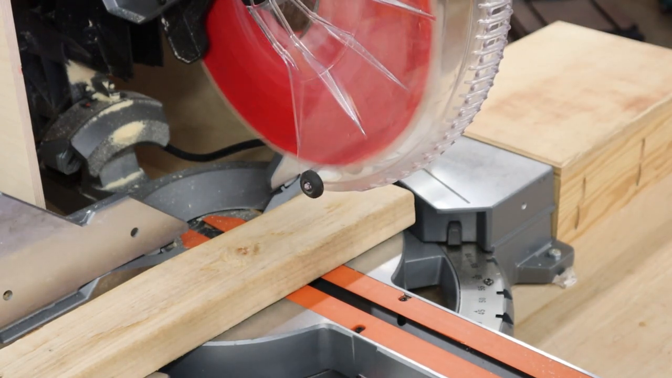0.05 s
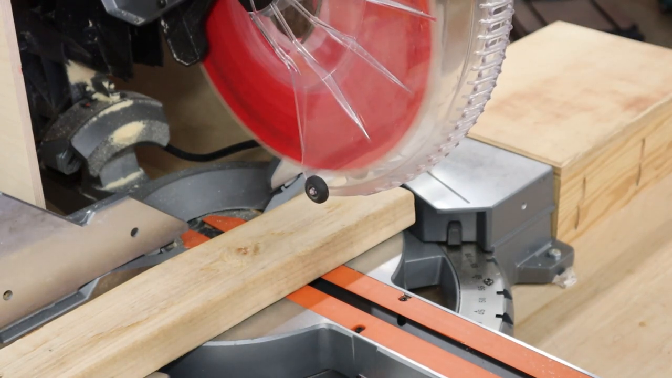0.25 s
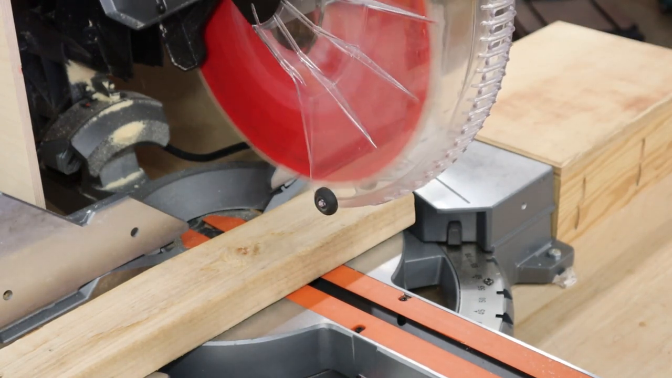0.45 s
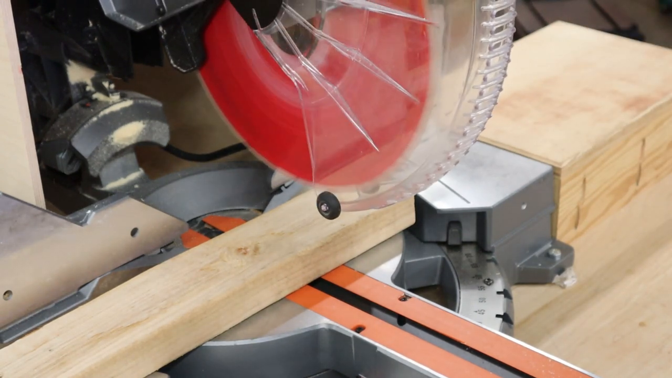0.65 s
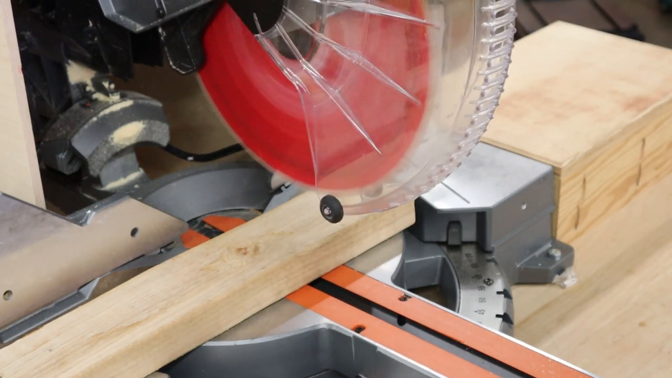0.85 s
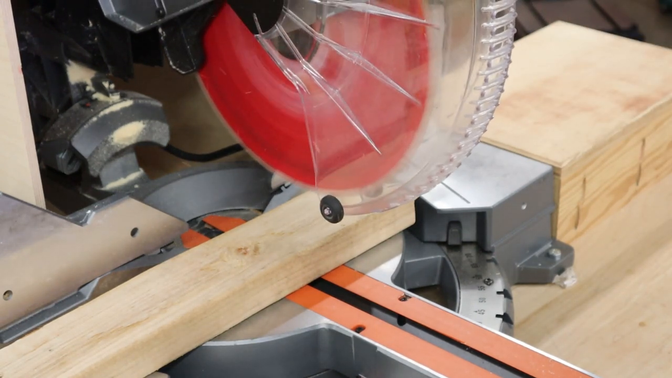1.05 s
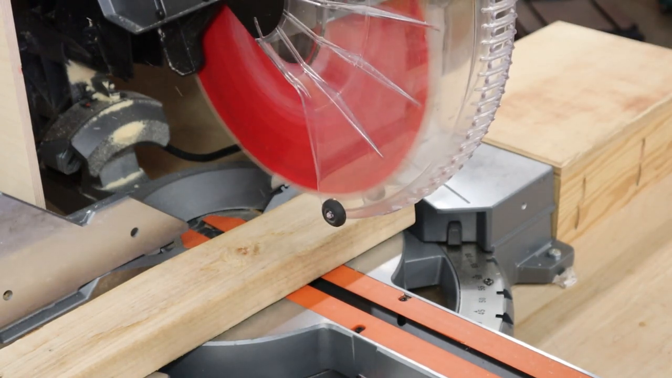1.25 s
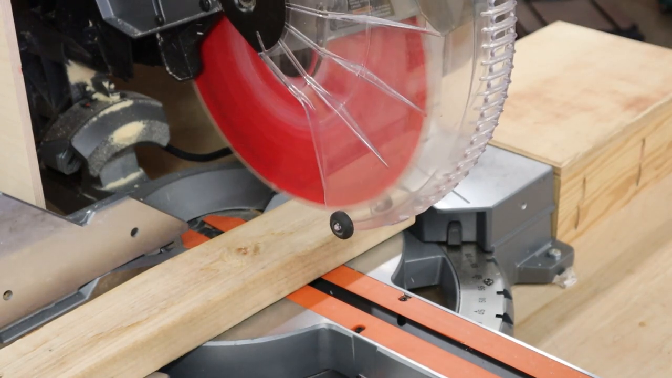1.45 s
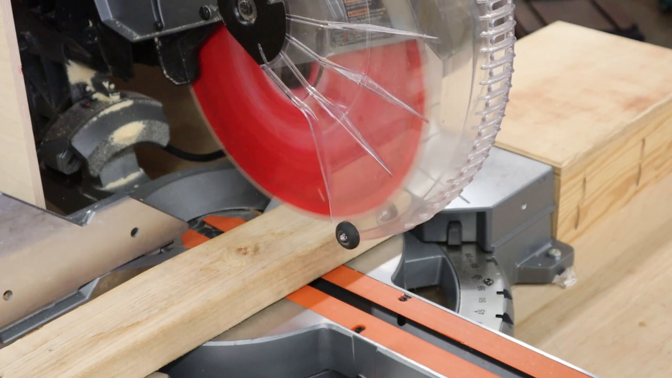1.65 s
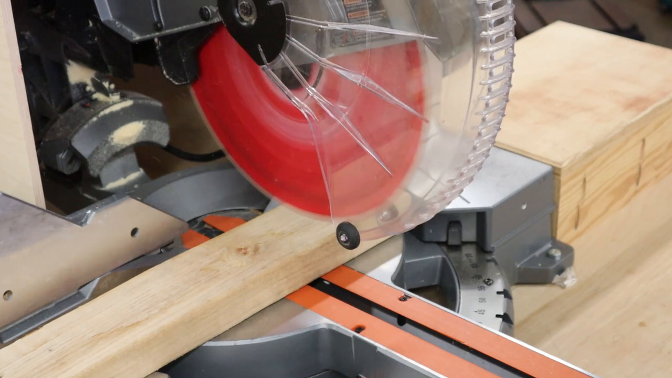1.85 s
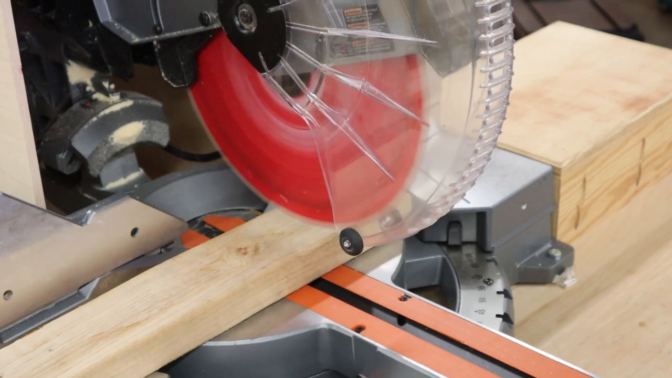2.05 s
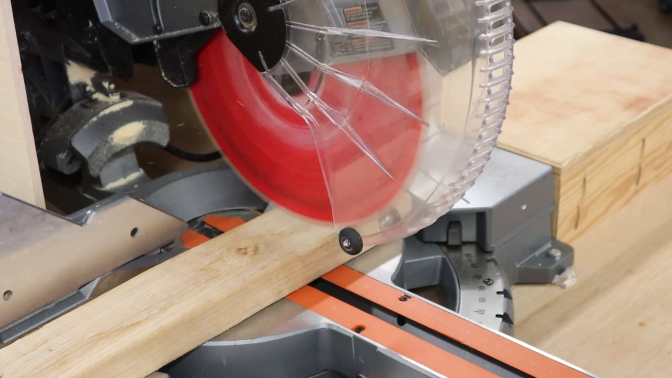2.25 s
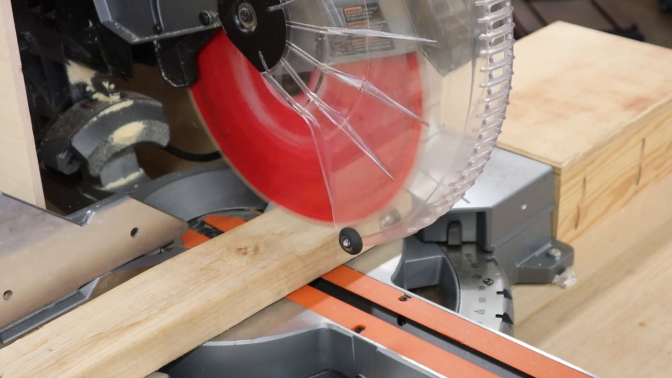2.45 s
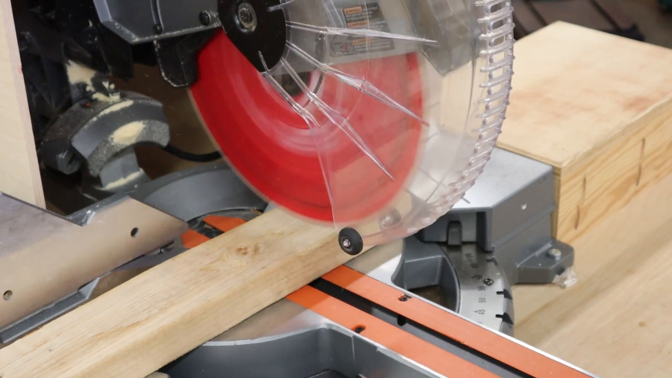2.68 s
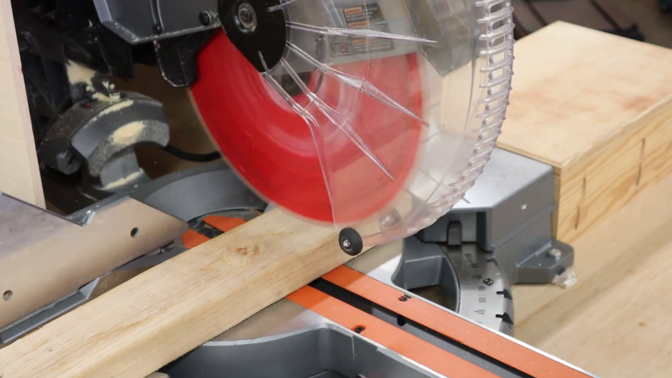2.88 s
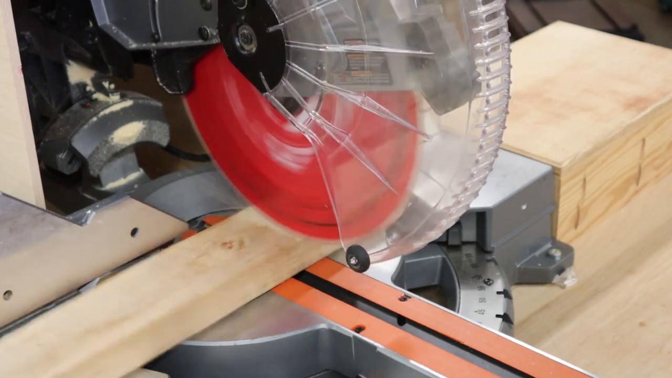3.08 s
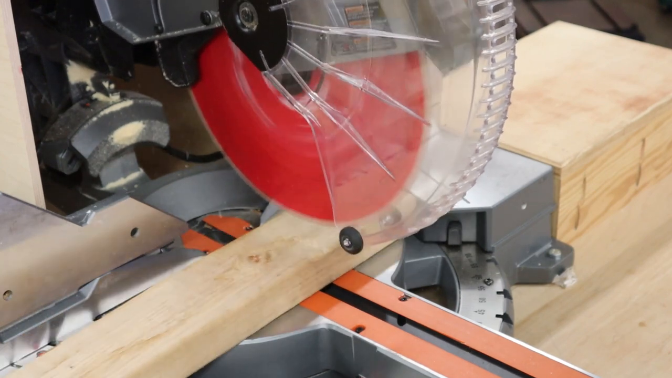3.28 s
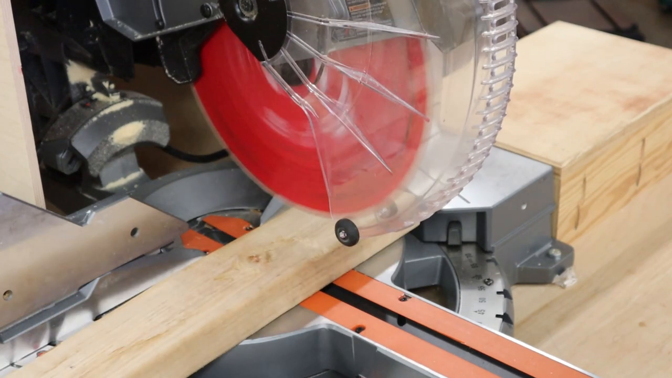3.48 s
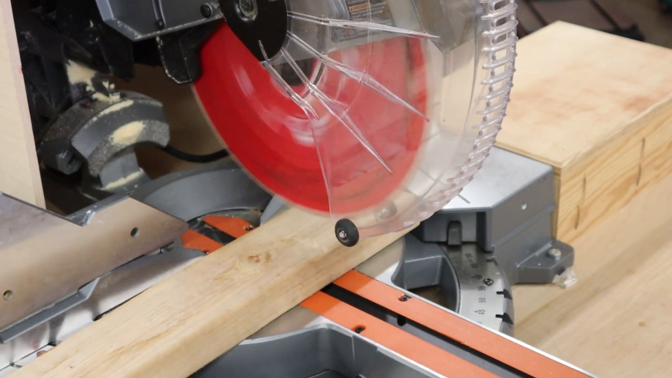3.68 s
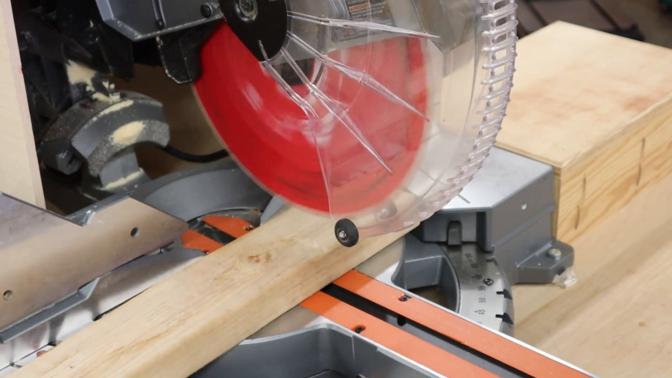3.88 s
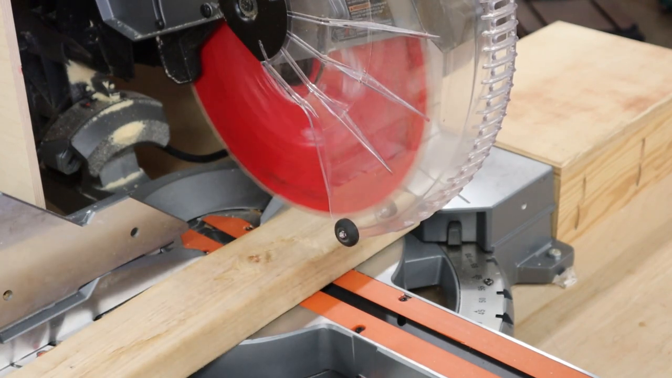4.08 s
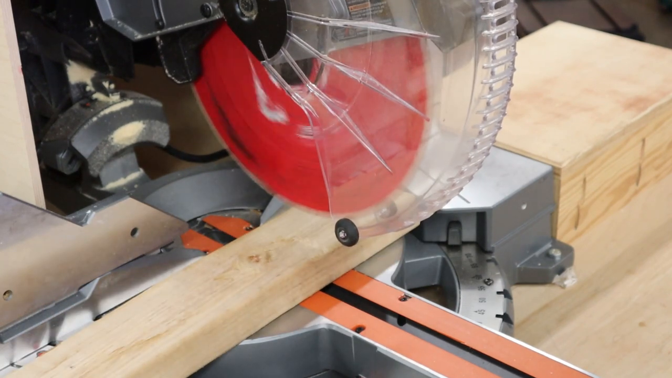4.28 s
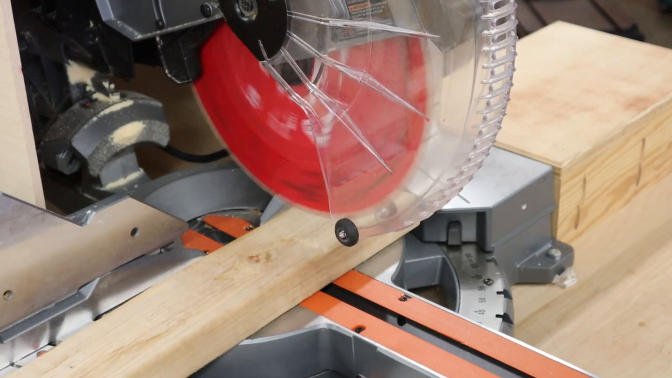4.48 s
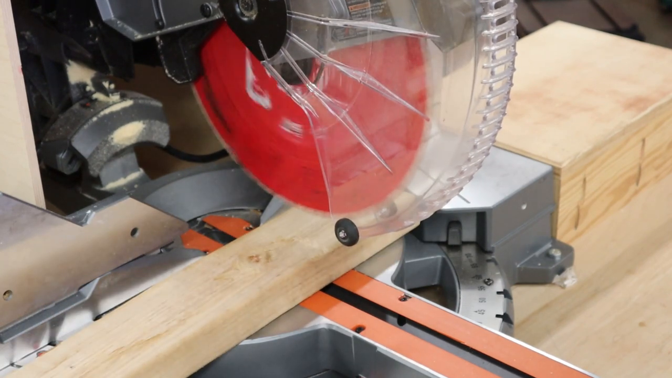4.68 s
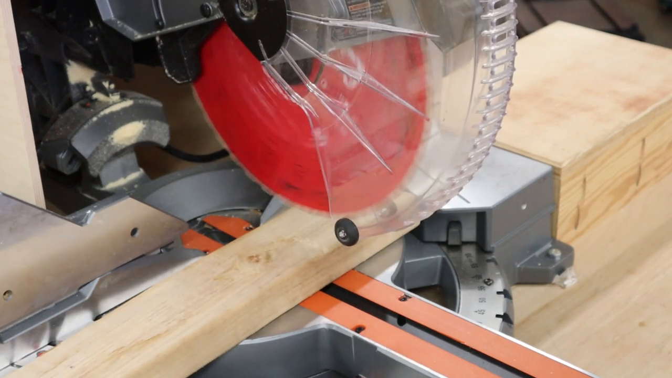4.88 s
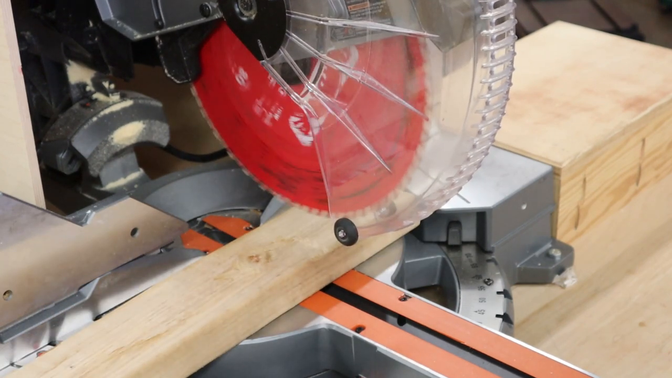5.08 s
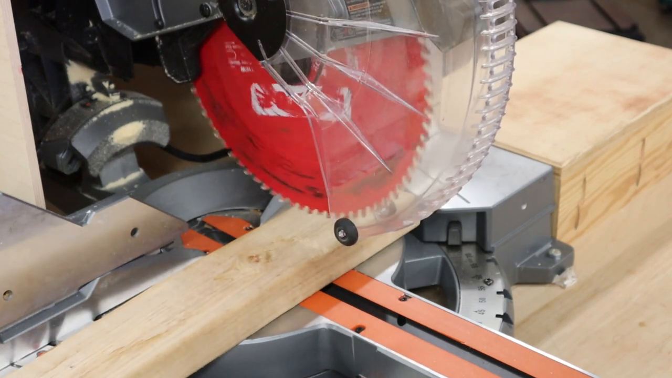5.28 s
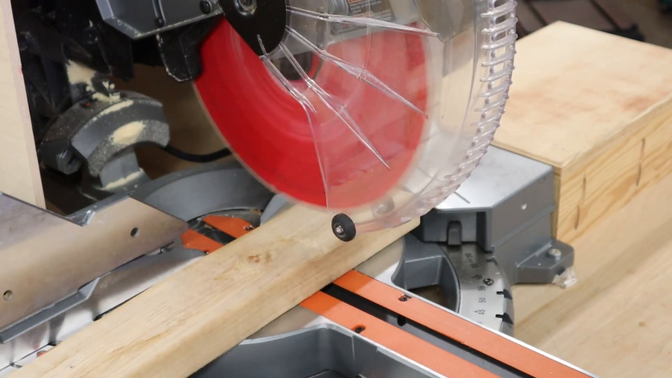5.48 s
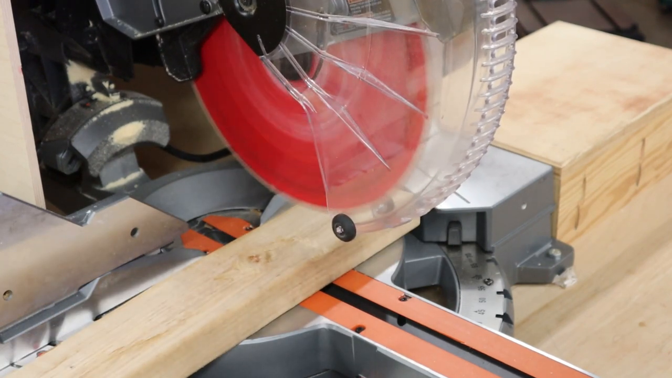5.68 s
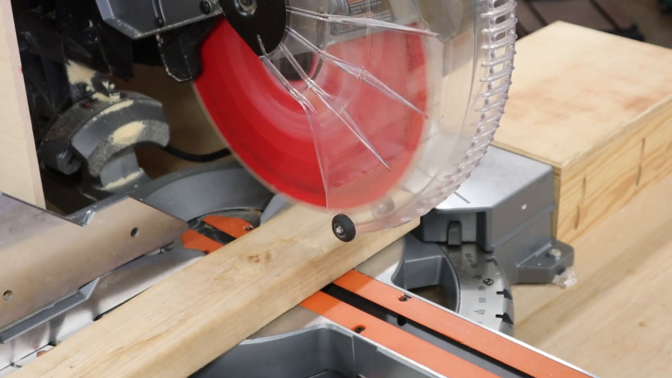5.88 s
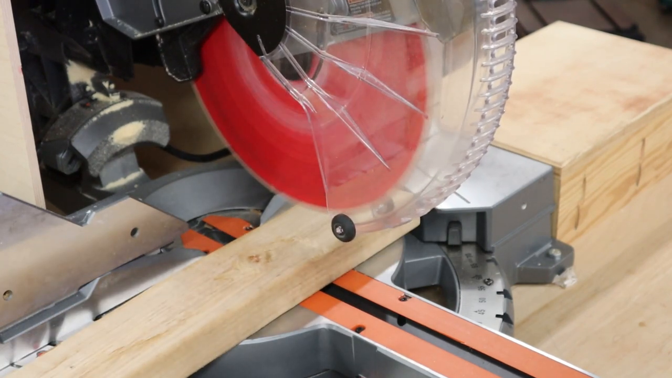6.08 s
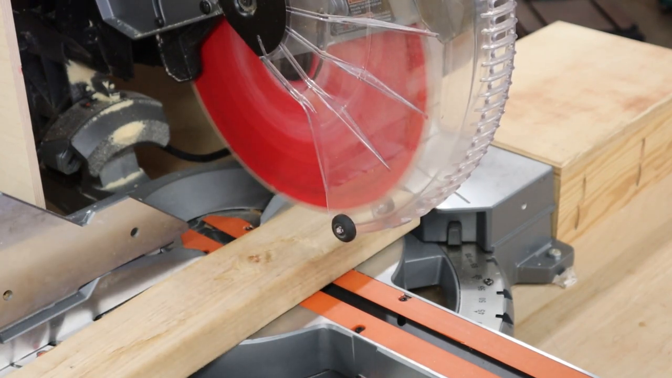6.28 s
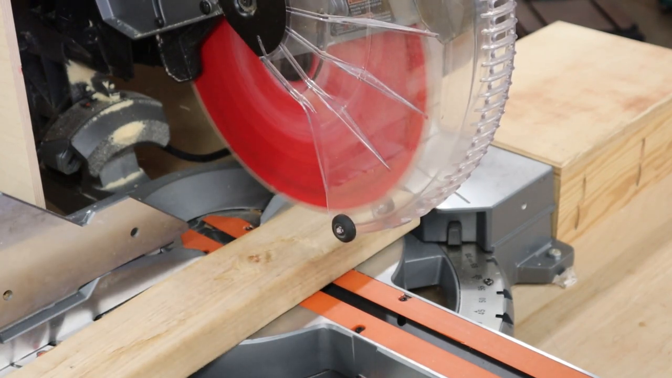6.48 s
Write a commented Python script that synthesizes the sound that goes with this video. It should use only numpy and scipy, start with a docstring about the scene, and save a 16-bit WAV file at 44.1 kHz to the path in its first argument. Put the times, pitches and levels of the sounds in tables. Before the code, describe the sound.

A miter saw clunks on, whines up to a loud full-speed scream, brakes with a knock, coasts down chattering, then whines up again.

```python
"""Miter saw, switched on twice

Switch click, jolt and clang; mains hum; gear whine and rattle run up to speed in a rush of fan and blade air.
The trigger is let go: the motor brakes with a knock, the slowing blade rasps and knocks on a board, then coasts
with chattering gears. Just before standstill it is switched on again. One shaft speed drives tones locked to the
shaft, random tooth impacts through housing resonances, and filtered noise. Small workshop, peaks overloaded."""
import sys
import numpy as np
from scipy import signal
from scipy.fft import rfft, irfft
from scipy.io import wavfile
from scipy.ndimage import uniform_filter1d

SR = 44100
rng = np.random.default_rng(int(sys.argv[2]) if len(sys.argv) > 2 else 0)


def store_pcm(level_fs):
    """Save levels as 16-bit WAV."""
    pcm = np.round(np.clip(level_fs, -1, 1) * 32767).astype(np.int16)
    wavfile.write(sys.argv[1], SR, np.atleast_2d(pcm).T)


N = 288414
TIME = np.arange(N) / SR
STARTS_S, BRAKE_S, COAST_S = [0.0, 5.444], 2.012, 3.245
GEAR_RATIO = 5  # shaft turns per blade turn


def from_db(db):
    """Decibels to gain."""
    return 10 ** (np.asarray(db) / 20)


def rms_one(x):
    """Scale to rms 1."""
    return x / np.sqrt(np.mean(x ** 2) + 1e-20)


def in_time(rows):
    """Each column of a curve, interpolated at every sample."""
    time_s, *columns = np.transpose(rows)
    return [np.interp(TIME, time_s, column) for column in columns]


def drift(corner_hz):
    """Smooth random wavering of spread 1: noise through a double pole, at SR / 20."""
    pole = np.exp(-40 * np.pi * corner_hz / SR)
    noise = rng.standard_normal(N // 20 + 2002)
    slow = signal.lfilter([1], [1, -2 * pole, pole * pole], noise)[2000:]
    return np.interp(np.arange(N) / 20, np.arange(len(slow)), rms_one(slow))


def colour(x, spectrum, resonances=(), size=8192):
    """Causal filter: a smooth spectrum with resonance peaks on top."""
    hz = np.fft.rfftfreq(size, 1 / SR) + 1
    points_hz, levels_db = np.transpose(spectrum)
    db = np.interp(np.log(hz), np.log(points_hz), levels_db)
    for centre_hz, width_hz, boost_db in resonances:
        db = db + boost_db / (1 + (2 * (hz - centre_hz) / width_hz) ** 2)
    cepstrum = irfft(np.log(from_db(db)))[:size // 2]
    cepstrum[1:] *= 2  # minimum phase: nothing rings before its cause
    response = irfft(np.exp(rfft(cepstrum, size)))
    return signal.fftconvolve(x, response)[:N]


def dull_and_bright(x, split_hz=1900):
    """The parts below and above a split, each of rms 1."""
    filters = [signal.butter(4, split_hz, kind, fs=SR, output="sos") for kind in ("low", "high")]
    return [rms_one(signal.sosfilt(sos, x)) for sos in filters]


def impacts(per_s, spread_db):
    """Tiny random collisions of uneven strength; rms 1."""
    strength = from_db(spread_db * np.minimum(rng.exponential(1, N), 4))
    signed = strength * rng.choice([-1, 1], N)
    return rms_one(signed * (rng.random(N) < per_s / SR))


def strikes(starts_s, levels_db, t60s_s):
    """An envelope that jumps at each start and dies away."""
    envelope = 0
    for start_s, level_db, t60_s in zip(starts_s, levels_db, t60s_s):
        age_s = np.clip(TIME - start_s, 0, 4 * t60_s)
        envelope = envelope + from_db(level_db - 60 * age_s / t60_s) * (TIME >= start_s)
    return envelope


def tone(turns, order, rough_rad, flutter_db, flutter_hz=25):
    """A sine locked to the shaft, with uneven timing and strength; rms 1."""
    phase = 2 * np.pi * order * turns + rough_rad * drift(31.6)
    return rms_one(np.sin(phase) * from_db(flutter_db * drift(flutter_hz)))


# quick and slow approach to full speed: gain_turns_per_s, time_constant_s
RUN_UP = [(135.9, .2308), (220, .8534)]
# braking tends to an end speed; then friction alone slows the shaft
BRAKE_END_TURNS_PER_S, BRAKE_TIME_S, FRICTION_TURNS_PER_S2 = 22.8, .5653, 25.5


def shaft_speed():
    """Turns per second: the run-up levels off, braking dies away, coasting runs down evenly."""
    first_run = TIME < STARTS_S[1]
    since_on_s = np.where(first_run, np.minimum(TIME, BRAKE_S) - STARTS_S[0], TIME - STARTS_S[1])
    driven = sum(gain * (1 - np.exp(-since_on_s / lag_s)) for gain, lag_s in RUN_UP)
    braking_s = np.clip(TIME, BRAKE_S, COAST_S) - BRAKE_S
    excess = driven - BRAKE_END_TURNS_PER_S
    braked = BRAKE_END_TURNS_PER_S + excess * np.exp(-braking_s / BRAKE_TIME_S)
    slowed = braked - FRICTION_TURNS_PER_S2 * np.maximum(TIME - COAST_S, 0)
    return np.maximum(np.where(first_run, slowed, driven), 1)


def motor_state(speed, top_from=265, top_span=45, size=600):
    """Shares 0-1 of speeding up, running at top speed and braking; all zero while coasting."""
    powered = uniform_filter1d(1.0 * ((TIME < BRAKE_S) | (TIME > STARTS_S[1])), size=size)
    braking = uniform_filter1d(1.0 * ((TIME >= BRAKE_S) & (TIME < COAST_S)), size=size)
    at_top = np.clip((speed - top_from) / top_span, 0, 1)
    return np.array([powered * (1 - at_top), powered * at_top, braking])


def above(speed, knee):
    """Rises from 0 to 1 as the speed passes the knee (turns per s)."""
    return 1 / (1 + (knee / speed) ** 4)


def near_speed(speed, state, centre, width, db):
    """A gain that sets in while the motor pulls the gears through a narrow range of speed."""
    return from_db(db * state[0] * np.exp(-np.abs((speed - centre) / width) ** 3))


# blows at every start: delay_s, thud_db, crack_db, ring_db, t60_s
START_KNOCKS = [(0, -20, -8, -22, 0.023), (.0073, 4, -6.5, -8, 0.03), (.075, -20.5, -68, -5, 0.024),
                (.132, -36, -35, -5, .032)]
# brake bites, then blade knocks on the board: start_s, thud_db, crack_db, ring_db, t60_s
KNOCKS = [(2.04, -7, -12, -13, 0.082), (3.237, -30, -27, 1.5, 0.019), (3.245, -13, -18, -19, 0.025)]
# blade modes: pitch_hz, level_db (relative to ring_db), t60_s
BLADE_MODES = [(272.5, -29, 0.83), (1050, -37, 0.12), (1541, 0.5, .04), (1500, -34, 0.56), (3790, -31, .05),
               (5800, -49, .15), (9609, -45, 0.11)]
# thud and crack spectra: freq_hz, density_db_per_hz (relative)
THUD = [(40, -39), (200, -29), (330, -25), (470, 8.5), (700, -2), (1020, 12.5), (1500, -8), (2500, -11),
        (6000, -28), (16000, -48)]
CRACK = [(200, -2.5), (1200, -8.5), (2800, 2.5), (3900, 4.5), (5200, -8), (9000, -6.5), (12000, -13),
         (16000, -35)]
# gear housing and guard resonances: centre_hz, width_hz, boost_db
HOUSING = [(452, 107, 7.5), (600, 38, 0.5), (992, 60, 5.5), (1178, 100, 3), (1454, 49, 4), (1760, 79, 2.5),
           (2433, 84, 4), (2717, 44, 5), (3010, 110, -1), (4240, 770, 5), (5510, 130, 4), (6026, 450, 7.5),
           (6760, 330, 3.5), (7220, 160, 6), (8630, 580, 7), (9550, 340, 5.5), (10000, 200, 2),
           (11300, 180, 5)]


def knocks():
    """Each knock is a thud of the frame, a metallic crack and a ring of the blade."""
    rows = [(on_s + delay_s, *blow) for on_s in STARTS_S for delay_s, *blow in START_KNOCKS]
    start_s, thud_db, crack_db, ring_db, t60_s = np.transpose(rows + list(KNOCKS))
    thud_noise = rms_one(colour(impacts(4400, spread_db=-2.5), THUD, HOUSING))
    thud = strikes(start_s, thud_db, t60_s) * thud_noise
    crack_noise = rms_one(colour(rng.standard_normal(N), CRACK, HOUSING))
    crack = strikes(start_s, crack_db, t60_s) * crack_noise
    blows = np.zeros(N)
    blows[(np.abs(start_s) * SR).astype(int)] = from_db(ring_db)
    age_s = TIME[:SR]
    ring = 0
    for hz, level_db, mode_t60_s in BLADE_MODES:
        ring = ring + from_db(level_db - 60 * age_s / mode_t60_s) * np.sin(2 * np.pi * hz * age_s)
    return thud + crack + signal.fftconvolve(blows, ring)[:N]


# mains hum: pitch_hz, level_db (relative)
HUM = [(120, -22), (240, -52), (360, -62), (480, -15), (600, -28.5)]


def mains_hum(speed, current):
    """Starting current shakes the field coils, hardest once the rotor turns, and fades with gained speed."""
    shaking = current * (.5 + 0.68 * above(speed, knee=43))
    hum = 0
    for hz, level_db in HUM:
        hum = hum + from_db(level_db - 4.5) * np.sin(2 * np.pi * hz * TIME + 0.1 * drift(25))
    return shaking * hum


BEARING_ORDER, MESH_ORDER = 4.08, 8  # cycles per shaft turn
# main tones, before the gear case: rising_db, top_db, braking_db
BEARING_DB, MESH_DB, OCTAVE_DB = (-26, -23.5, -23), (-18.5, -20.5, -22.5), (-22, -33.5, -24)
# on the way up the gears howl: centre_turns_per_s, half_width_turns_per_s, boost_db
HOWL = (149.5, 13.4, 10.8)
# weaker tones: cycles_per_shaft_turn, rising_db, top_db, braking_db (relative)
OVERTONES = [(1.001, -19.5, -18.5, -19), (1.998, -47, -8.5, -44), (5.223, -11, -29, -12),
             (11.92, -37, -12.5, -38), (14.28, -55, -12, -43), (23.92, -13, -19, -26), (32, -12, -19, -26),
             (40.8, -20, -21, -16)]
# gear case radiation: freq_hz, level_db
CASE = [(300, 3), (550, -3), (800, -1.5), (1700, 0), (2400, -3), (3600, -1.5), (4500, -2.5), (5200, 1.5)]
# gear case resonances: centre_hz, width_hz, boost_db
CASE_MODES = [(994, 134, 14.5), (1164, 440, -3.5), (1421, 180, 10.5), (2220, 120, 5), (4250, 460, 11)]
# loaded gear spectrum: freq_hz, density_db_per_hz (relative)
LOADED = [(88, -51), (150, -26), (303, -21.5), (466, -13.5), (730, -11.5), (979, -1), (1100, -6),
          (1450, -3), (2020, -10), (4320, -10), (5460, -23), (6140, -14), (7920, -22.5), (10000, -21),
          (16000, -48)]


def whine(speed, turns, state):
    """Bearing and gear tones; the blade gear runs slightly off centre and sways the mesh once a blade turn."""
    rising, at_top, braking = state
    sway = np.sin(2 * np.pi * turns / GEAR_RATIO)
    # steadier at top speed and late in the braking
    unrest = 1 - 0.21 * at_top - 0.4 * braking * (1 - above(speed, knee=200))
    swayed = turns + .011 * sway * unrest

    bearing_gain = from_db(BEARING_DB) @ state * above(speed, knee=138)
    bearing = bearing_gain * tone(turns, BEARING_ORDER, rough_rad=0.96 * unrest, flutter_db=5.0)
    meshed = 1 - rising * (1 - above(speed, knee=109))
    mesh_gain = from_db(MESH_DB) @ state * meshed * near_speed(speed, state, *HOWL)
    mesh = mesh_gain * tone(swayed, MESH_ORDER, rough_rad=1.77 * unrest, flutter_db=2.0)
    octave_gain = from_db(OCTAVE_DB) @ state * above(speed, knee=55)
    octave = octave_gain * tone(swayed, 2 * MESH_ORDER, rough_rad=1.03, flutter_db=3.5)
    main = bearing + mesh * (1 + 0.24 * sway) + octave * (1 + 0.23 * sway)

    engaged = np.clip((speed - 70) / 70, 0, 1)
    weak = 0
    for order, *levels_db in OVERTONES:
        overtone = tone(turns, order, rough_rad=0.84 * unrest, flutter_db=3.5, flutter_hz=37)
        weak = weak + from_db(levels_db) @ state * overtone
    # each tone flares up as it sweeps through a resonance
    tilt = [(300, 3.0), (1500, -15.5), (3000, 3.5), (4300, -6.5), (11000, -2.5)]
    radiated = colour(weak * engaged, tilt, HOUSING)
    return colour(main, CASE, CASE_MODES) + from_db(-4) * colour(radiated, LOADED, HOUSING)


# tooth rattle: power_db, added_by_starting_current_db, braking_db, fades_below_turns_per_s
DULL_RATTLE, BRIGHT_RATTLE = (-23, 9, -20.5, 42), (-19.5, 1, -26, 96)
# on the way up the gears slap less: centre_turns_per_s, half_width_turns_per_s, boost_db
CALM = (172, 32, -3.5)


def gear_rattle(speed, turns, state, current):
    """Teeth slap in bunches, once a blade turn, and ring the housing; harder with speed and torque."""
    rising, at_top, braking = state
    bunching = from_db(0.48 * np.sin(2 * np.pi * turns / GEAR_RATIO) + 1.2 * drift(46))
    slaps = impacts(900 + 12 * speed, spread_db=-0.5) * bunching
    parts = dull_and_bright(colour(slaps, LOADED, HOUSING))
    pulling = (rising + from_db(-4.0) * at_top) * near_speed(speed, state, *CALM)
    rattle = 0
    for part, (power_db, torque_db, braking_db, knee) in zip(parts, (DULL_RATTLE, BRIGHT_RATTLE)):
        force = pulling * from_db(power_db + torque_db * current) + braking * from_db(braking_db)
        rattle = rattle + part * force * np.sqrt(above(speed, knee))
    return rattle


# blade song: rising_db, top_db, braking_db; coasting level is relative to the bright chatter
SINGING_DB, SINGING_COAST_DB = (-34.5, -31.5, -24), -9
# singing modes: pitch_hz, width_hz, level_db (relative)
SINGING_MODES = [(2980, 150, 4.5), (4216, 120, 2), (4220, 89, 5.5), (4450, 45, -6), (5700, 67, -11),
                 (5960, 99, -3), (8700, 230, -28), (9250, 120, -26), (10070, 110, -16), (11400, 180, -20)]


def blade_song(speed, state, free):
    """Gear knocks travel down the arbor and keep the modes of the blade ringing."""
    shaking = impacts(1500, spread_db=1.5)
    song = 0
    for hz, width_hz, level_db in SINGING_MODES:
        mode = signal.lfilter(*signal.iirpeak(hz, hz / width_hz, fs=SR), shaking)
        song = song + from_db(level_db) * rms_one(mode)
    loaded = from_db(SINGING_DB) @ state * above(speed, knee=42)
    loose = free * from_db(in_time(COAST)[1] + SINGING_COAST_DB)
    return (loaded + loose) * rms_one(song)


# air spectrum: freq_hz, density_db_per_hz (relative)
AIR = [(100, -36), (250, -19.5), (330, -14), (520, -13.5), (680, -1), (1100, -5), (1600, -1.5), (2100, -4),
       (4200, -5), (5200, -14), (7900, -29.5), (10000, -15), (16000, -31.5)]
AIR_REFERENCE_TURNS_PER_S = 348


def air_rush(speed, turns):
    """The cooling fan and the blade churn the air, steeply louder with speed."""
    sway_db = 0.56 * np.sin(4 * np.pi * turns / GEAR_RATIO)
    churn = rng.standard_normal(N) * from_db(sway_db + 2.0 * drift(94))
    level_db = -15 + 30.3 * np.log10(np.maximum(speed, 1) / AIR_REFERENCE_TURNS_PER_S)
    return from_db(level_db) * rms_one(colour(churn, AIR, HOUSING))


def bench_shake(speed, turns):
    """While the motor pulls or brakes hard, the unbalanced blade rocks the bench at its low resonance."""
    wobble = sum(tone(turns, k / GEAR_RATIO, rough_rad=.5, flutter_db=2) for k in (1, 2))
    acceleration = np.abs(uniform_filter1d(np.gradient(speed) * SR, size=4000))
    force = np.clip(acceleration / 200, 0, 1) ** 2 * np.clip(speed / 110, 0, 1) ** 2
    bench = [(15, -16), (28, -3), (46, -9.5), (58, 0), (75, -26), (150, -37)]
    return from_db(-41.5) * colour(wobble * force, bench)


# teeth catch on the board, then graze it: start_s, level_db, t60_s
RASP = [(3.214, -4, 0.068), (3.229, -12, 0.085), (3.305, -32, .35)]


def rasp(turns, tooth_count=60):
    """The teeth of the blade scrape the board one after another."""
    teeth = 1 + 0.23 * np.sin(2 * np.pi * tooth_count * turns / GEAR_RATIO)
    scrape = colour(rng.standard_normal(N) * teeth, CRACK, [(1560, 410, 8.8), (3720, 6500, 5.5)])
    return strikes(*np.transpose(RASP)) * rms_one(scrape)


# loose gears while coasting: time_s, dull_db, bright_db, rumble_db (relative)
COAST = [(3.29, -27.5, -33, -44), (3.44, -30, -37, -42), (3.59, -35, -42, -43), (3.93, -29.5, -33, -39),
         (4.53, -30, -36, -37.5), (4.71, -27.5, -37, -33.5), (5.03, -33.5, -44.5, -33.5),
         (5.29, -40.5, -60, -28), (5.43, -56, -55, -32)]
# gears fall through their backlash: hit_s, peak_db (relative)
CHATTER = [(3.3, -10.5), (3.431, -16), (3.502, -16.5), (3.582, -16.5), (3.647, -17), (3.706, -15),
           (3.757, -14.5), (3.844, -14), (4.082, -22), (4.169, -13.5), (4.245, -11), (4.284, -16),
           (4.332, -19), (4.391, -21), (4.446, -24), (4.5, -17), (4.552, -14.5), (4.618, -14.5),
           (4.801, -25), (4.9, -25)]
# before each hit the teeth part; after it they bounce, then settle
PART_S, PART_DB, BOUNCE_S, SETTLE_S = .028, 7, .015, .014
# loose gear and bearing spectra: freq_hz, density_db_per_hz (relative)
LOOSE = [(88, -60), (150, -9), (406, -13), (439, -14), (545, -10), (601, 0.5), (716, -12), (998, 3),
         (1080, -6), (1450, -10), (1940, -22.5), (4240, -27.5), (4860, -37), (11500, -52.5), (16000, -59)]
RUMBLE = [(25, -8), (65, -21), (98, -1.5), (122, 0.5), (148, -20), (168, -6.5), (200, -9), (400, -24.5),
          (1000, -59)]


def coasting(free):
    """Without load the gears chatter softly in bursts, over the rumble of the bearings."""
    dull_db, bright_db, rumble_db = in_time(COAST)
    parted, bursts = 0, 0
    for hit_s, peak_db in CHATTER:
        parted = parted + 1.0 * ((TIME > hit_s - PART_S) & (TIME < hit_s))
        settling = np.exp(-np.clip(TIME - hit_s - BOUNCE_S, 0, 1) / SETTLE_S)
        bursts = bursts + from_db(peak_db) * (TIME >= hit_s) * settling
    contact = from_db(-PART_DB * uniform_filter1d(parted, size=130) + 0.5 * drift(39))
    dull, bright = dull_and_bright(colour(impacts(1500, spread_db=-1.0), LOOSE, HOUSING))
    gears = dull * np.hypot(contact * from_db(dull_db + 1.5), from_db(-15) * bursts)
    gears += bright * np.hypot(contact * from_db(bright_db), from_db(-22) * bursts)
    rumble = from_db(rumble_db - 3) * rms_one(colour(rng.standard_normal(N), RUMBLE))
    return free * (gears + rumble)


WORKSHOP_T60_S = 0.17


def workshop(x, wet_db=-11):
    """Dense reflections of a small room, duller than the direct sound."""
    age_s = TIME[:SR // 2]
    tail = rng.standard_normal(len(age_s)) * from_db(-60 * age_s / WORKSHOP_T60_S) * (age_s > .004)
    echoes = signal.fftconvolve(x, tail / np.linalg.norm(tail))[:N]
    return x + from_db(wet_db) * colour(echoes, [(200, 4.5), (2000, 3.5), (12000, -4.5)])


# room tone spectrum: freq_hz, density_db_per_hz (relative)
ROOM_TONE = [(20, -11), (45, -6), (65, -6), (120, 4), (300, -10.5), (1000, -6.5), (4000, -23.5),
             (16000, -43)]
# speed at which the starting current has about halved, and the share that keeps flowing
CURRENT_HALF_TURNS_PER_S, RUNNING_CURRENT = 131, 0.02


def scene():
    """The shaft speed drives every turning part of the saw; knocks and room tone are added."""
    speed = shaft_speed()
    turns = np.cumsum(speed) / SR
    state = motor_state(speed)
    powered, free = state[0] + state[1], 1 - state.sum(axis=0)
    current = powered * (1 - (1 - RUNNING_CURRENT) * above(speed, CURRENT_HALF_TURNS_PER_S))
    saw = knocks() + mains_hum(speed, current)
    saw += whine(speed, turns, state) + gear_rattle(speed, turns, state, current)
    saw += blade_song(speed, state, free) + air_rush(speed, turns)
    saw += rasp(turns) + coasting(free)
    floor = from_db(-41.5) * rms_one(colour(rng.standard_normal(N), ROOM_TONE))
    return (workshop(saw) + bench_shake(speed, turns) + floor)[None]


CUTOFF_HZ = 16000


def record(dry):
    """An overloaded microphone: the loudest peaks are flattened, the top is cut."""
    limited = dry / (1 + dry ** 6) ** (1 / 6)
    return signal.sosfilt(signal.ellip(10, .2, 80, CUTOFF_HZ, fs=SR, output="sos"), limited)


dry = scene()
out = record(dry)
store_pcm(out)
```